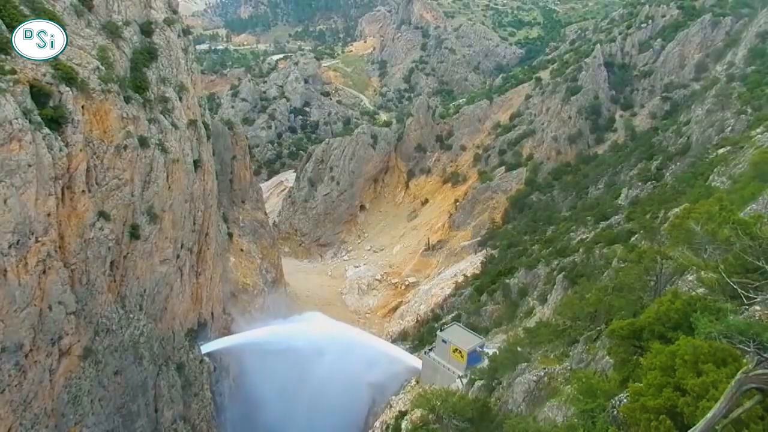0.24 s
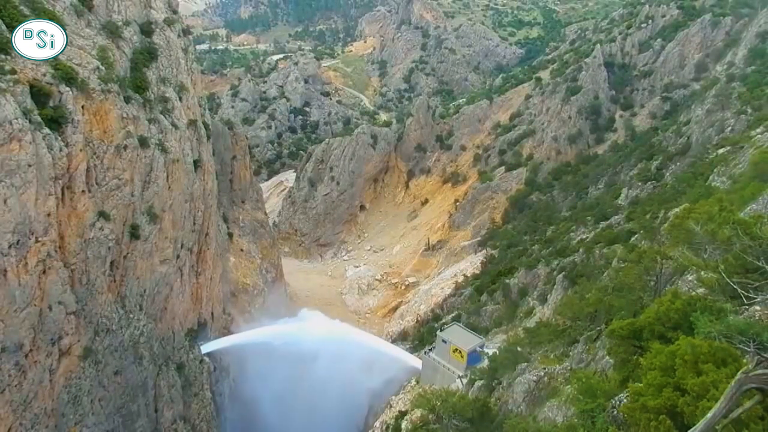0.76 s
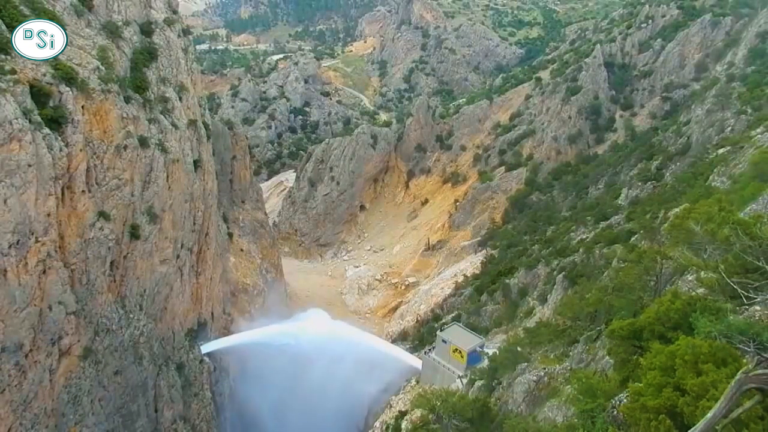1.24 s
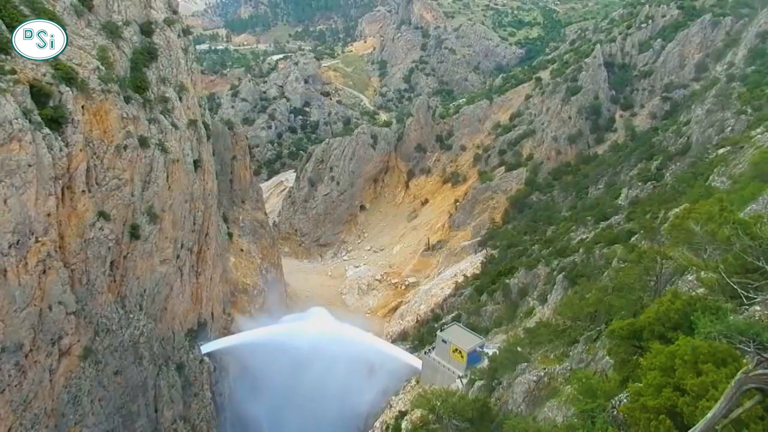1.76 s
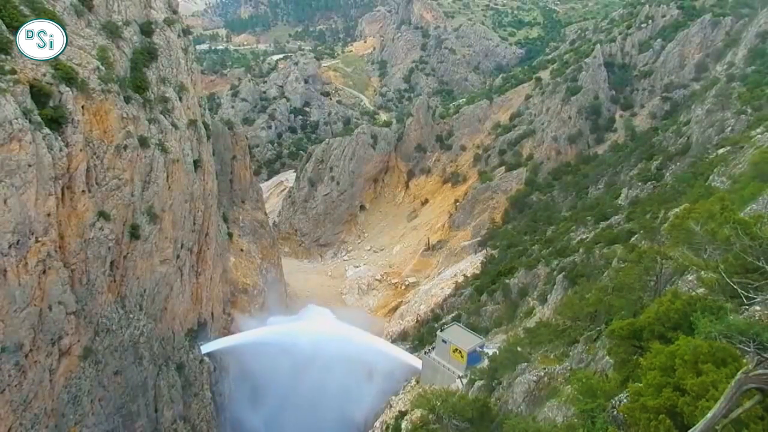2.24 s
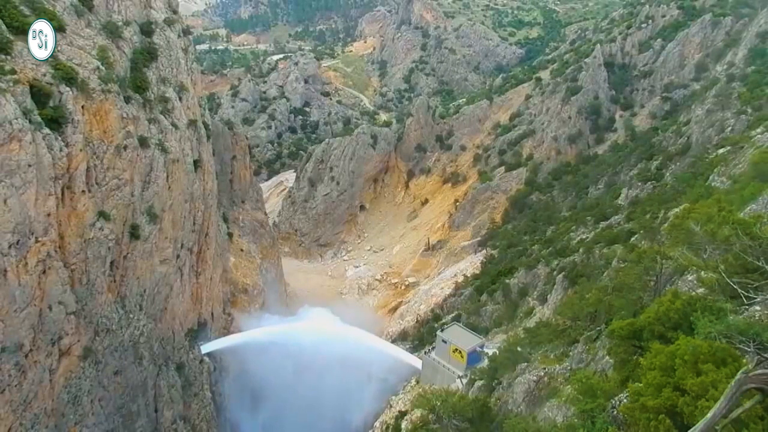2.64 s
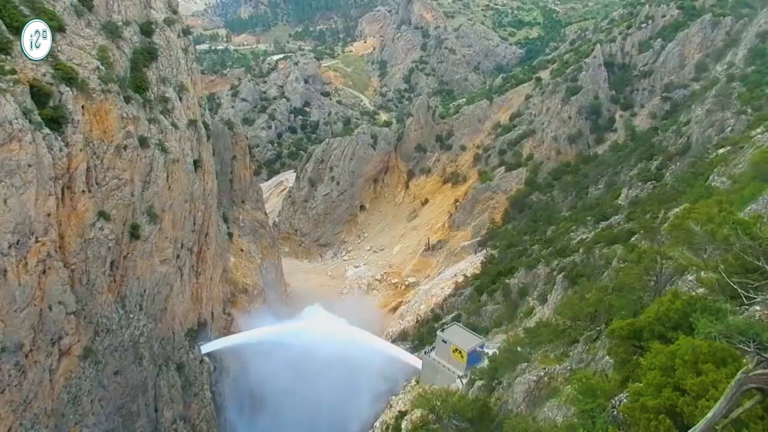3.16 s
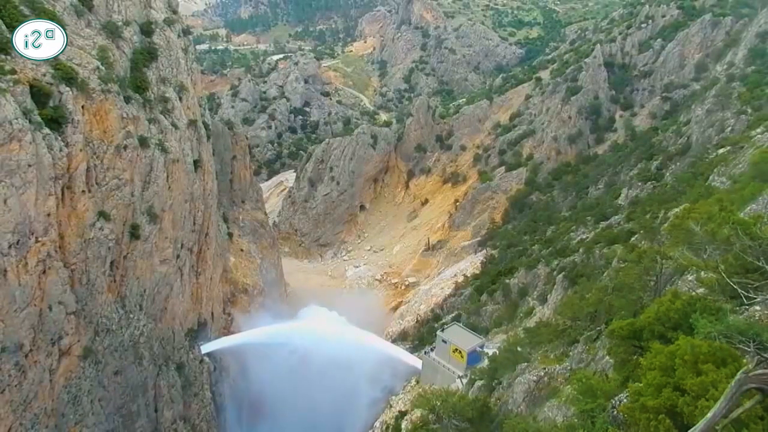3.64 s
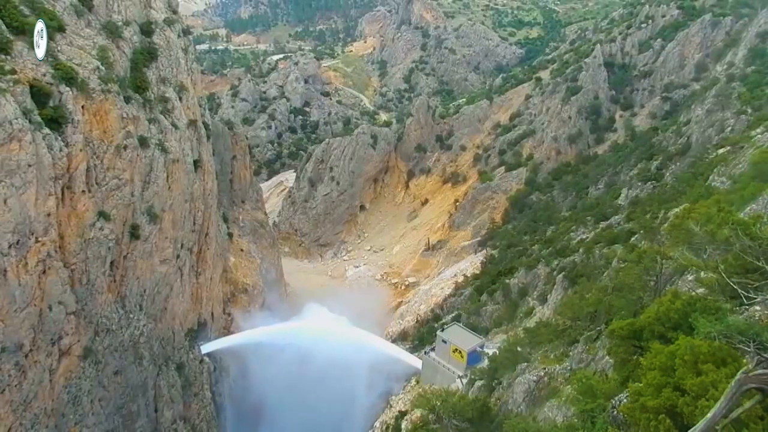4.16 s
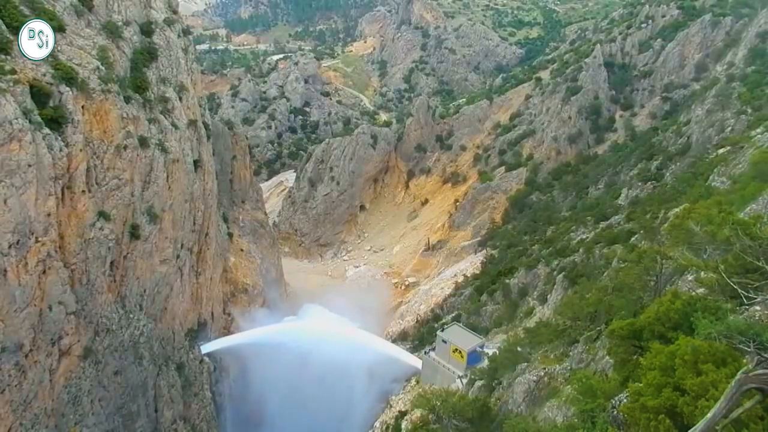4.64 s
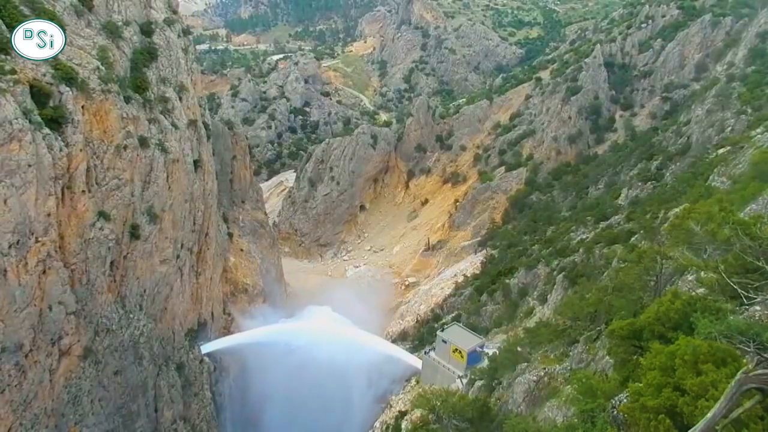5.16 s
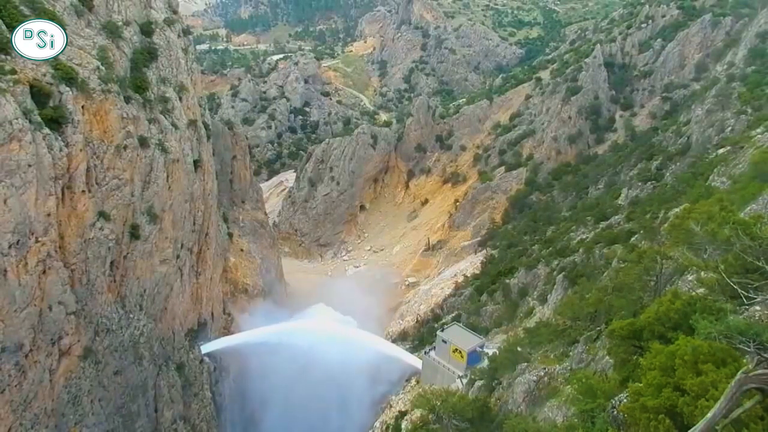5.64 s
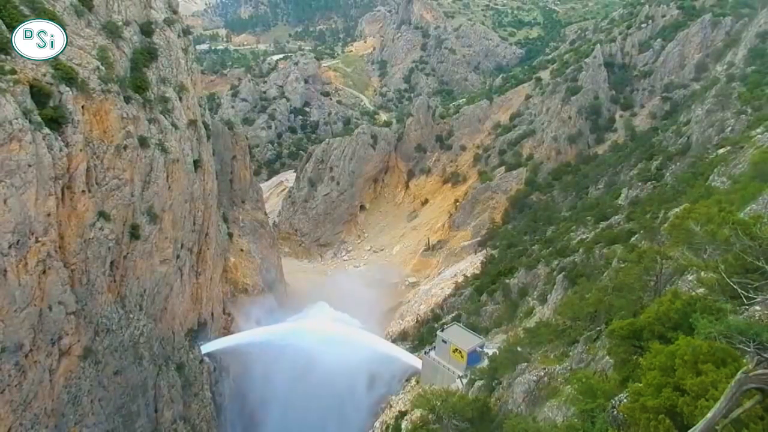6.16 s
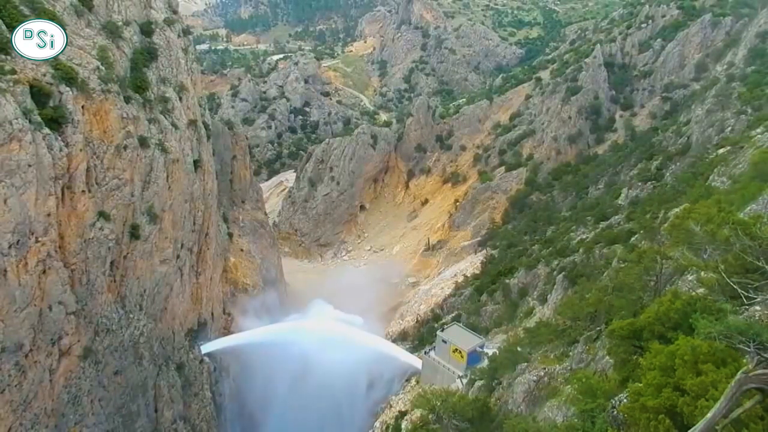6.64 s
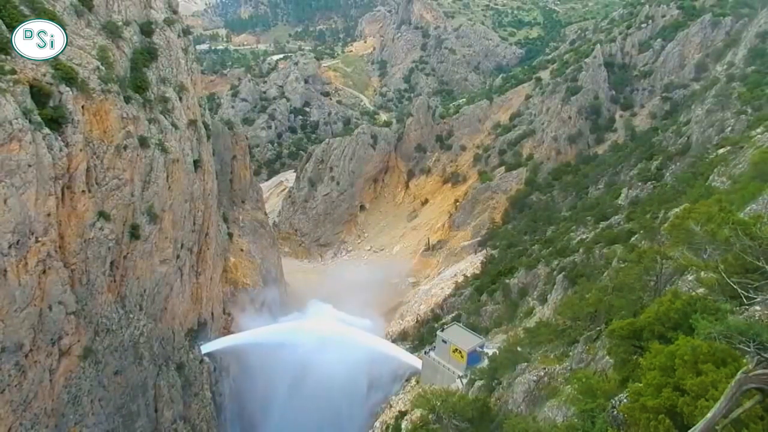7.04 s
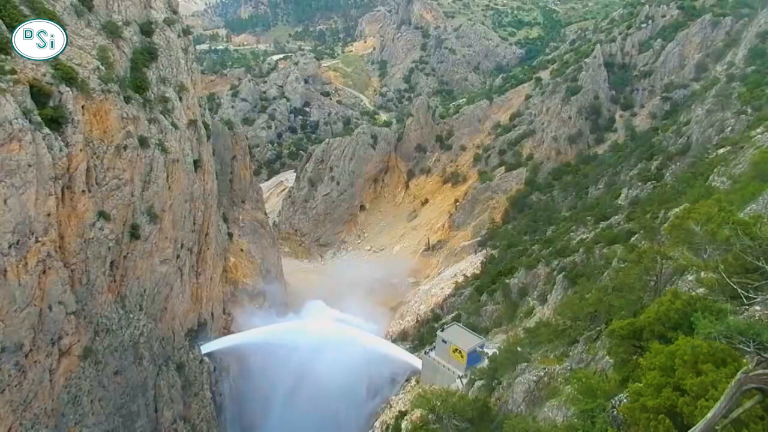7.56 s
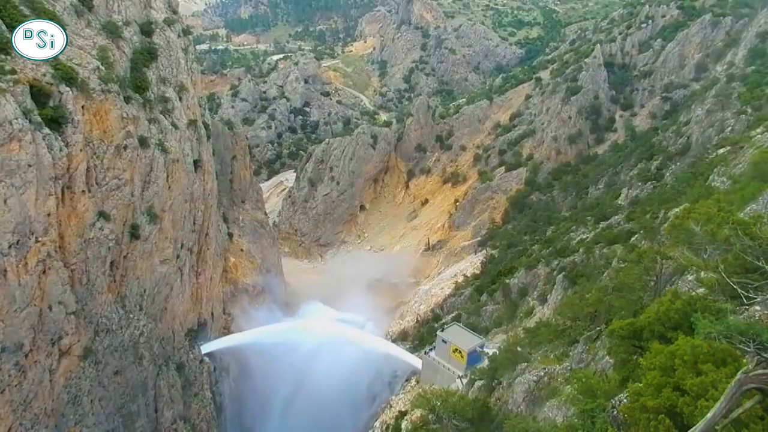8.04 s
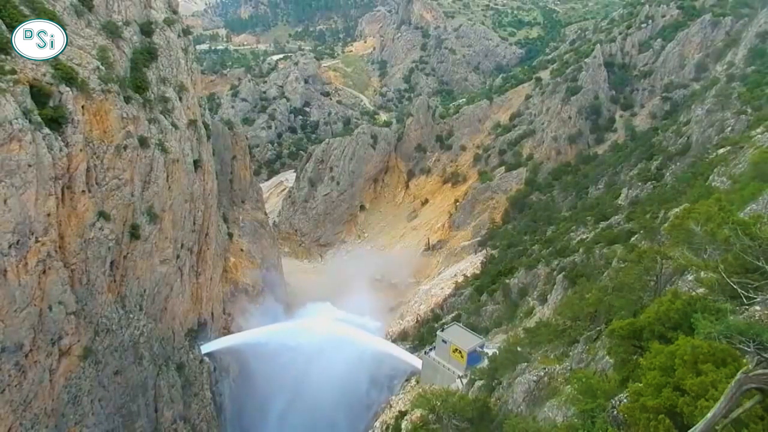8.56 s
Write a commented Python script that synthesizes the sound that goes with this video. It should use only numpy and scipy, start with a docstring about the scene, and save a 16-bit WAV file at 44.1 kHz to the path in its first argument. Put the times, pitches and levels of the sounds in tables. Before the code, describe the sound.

Two high-pressure jets from a dam pour into a deep rocky gorge, heard outdoors from far above on one microphone. A dense continuous roar, strong in the lows and softened on top by distance, carries a fine patchy spray hiss and grows very slightly throughout. Wind buffets the microphone with low lumpy rumble. The hardest gust hits at about 0.2-0.3 s with three quick heavy thumps; the roar ducks and swells back over the next few seconds. More gusts rumble at 0.7, 1.0 and 1.5 s, then it calms until a flurry around 3-3.2 s. Gusts with duller thumps come near 3.8, 4.8 and 5.5 s. From about 6 to 7.7 s mostly water remains. Buffeting returns at 7.8-8.1 s with several thumps, then lighter rumbles at 8.4 and 8.7 s. Barely audible ticks at 1.1 and 5.5 s, faint hiss and a very thin high whine lie underneath.

```python
"""Two high-pressure jets from a dam's outlets plunge into a deep rock gorge, heard from far above.
The falling water roars and its spray hisses: both are patchy noise, each with its own tone colour.
Gusts buffet the single microphone as low rumbling noise and short pressure slaps.
Faint ticks, amplifier hiss and a thin whine lie underneath.
The hardest wind pushes the recorder's gain down, so the roar drops and slowly swells back."""
import sys
import numpy as np
from scipy import signal
from scipy.fft import rfft, irfft, next_fast_len
from scipy.io import wavfile
from scipy.ndimage import uniform_filter1d, minimum_filter1d, map_coordinates

SR = 44100
rng = np.random.default_rng(int(sys.argv[2]) if len(sys.argv) > 2 else 0)


def dump_mix(stems):
    """Bounce the given channels to the path in sys.argv[1] as a 16-bit WAV at rate SR."""
    frames = np.atleast_2d(stems).T  # one column per channel
    limited = np.clip(frames, -1, 1)  # hard clip at full scale
    pcm = np.round(limited * 32767).astype(np.int16)
    wavfile.write(sys.argv[1], SR, pcm)


N = 388212  # length in samples


def amp(db):
    """Turn decibels into a gain factor."""
    return 10 ** (np.asarray(db) / 20)


def unit(x):
    """Scale x to an average strength (rms) of 1."""
    return x / np.sqrt(np.mean(x ** 2) + 1e-20)


def wobble(rate):
    """Draw a smooth random curve through `rate` random points a second."""
    points = rng.standard_normal(int(N * rate / SR) + 4)
    return map_coordinates(points, [np.arange(N) * rate / SR])


def filtered(x, response):
    """Multiply each frequency of x by the gain that response gives for it."""
    size = next_fast_len(N + SR // 2)  # spare room keeps the end from wrapping onto the start
    gain = response(np.fft.rfftfreq(size, 1 / SR))
    return irfft(rfft(x, size) * gain, size)[:N]


def coloured(x, spectrum):
    """Shape x by (f/Hz, level/dB) points joined on a log frequency axis, then scale it to rms 1."""
    hz, db = np.transpose(spectrum)

    def response(f):
        return amp(np.interp(np.log(f + 1), np.log(hz), db))

    return unit(filtered(x, response))


def churn(patchy_db):
    """Noise whose bands swell and fade in short patches, as clumps of water break up."""
    bands = signal.stft(rng.standard_normal(N), nperseg=512)[2]
    patches = rng.standard_normal(bands.shape)
    patches = uniform_filter1d(patches, size=7, axis=0)  # smooth across frequency
    patches = uniform_filter1d(patches, size=16, axis=1)  # smooth across time
    return signal.istft(bands * amp(patchy_db * unit(patches)), nperseg=512)[1][:N]


def water():
    """Countless impacts merge into a steady roar; the long air path takes the top off the spray."""
    # tone colour of the plunging water: (f/Hz, relative level per Hz/dB)
    roar_spectrum = [(15, -44), (30, -17), (54, -3), (75, 2), (115, -2), (175, -2.5), (270, -6.5),
                     (380, -7.5), (520, -10), (780, -11.5), (1300, -15.5), (2000, -20), (3400, -27.5),
                     (4800, -34.5), (7700, -59), (10000, -74), (16000, -120)]
    # tone colour of the spray: (f/Hz, relative level per Hz/dB)
    spray_spectrum = [(800, -30), (1800, -8), (2700, -1), (3600, -5.5), (4800, -12), (5800, -24.5),
                      (6700, -25), (8000, -46), (10000, -64.5)]
    start_db, growth_db_per_s = -17, 0.1822  # the water swells a little as the spray spreads

    plunge = amp(0.16 * wobble(2.8)) * coloured(churn(patchy_db=.5), roar_spectrum)
    spray_db = -17.5 + 0.44 * wobble(11.0)  # relative to the plunge
    spray = amp(spray_db) * coloured(churn(patchy_db=.5), spray_spectrum)
    flow_db = start_db + growth_db_per_s * np.arange(N) / SR + 0.17 * wobble(2.3)
    return amp(flow_db) * (plunge + spray)


def gustiness():
    """Each gust builds quickly and fades more slowly; their power adds to that of a restless breeze."""
    # gusts on the microphone: (t at the peak/s, rumble level before gain control/dB, fade time/s)
    gust_list = [(.04, -10, 0.07), (.28, 0, 0.16), (.68, -8.5, 0.24), (.97, -10.5, .05), (1.55, -9, .08),
                 (2.55, -21, 0.12), (3.02, -12, 0.077), (3.18, -14, .06), (3.59, -20, .05),
                 (3.8, -8.5, .11), (4.51, -13.5, .12), (4.78, -12, 0.18), (5.24, -16, .15),
                 (5.53, -12, 0.11), (5.69, -11.5, 0.09), (6.7, -25.5, 0.31), (7.85, -15.5, .12),
                 (8.09, -10.5, 0.086), (8.43, -16, 0.17), (8.731, -12, 0.062)]
    breeze_db = -28  # typical rumble between gusts
    rise_share = 0.61  # a gust builds in this share of its fade time

    power = amp(breeze_db + 4.1 * wobble(5)) ** 2
    for peak_s, db, fade_s in gust_list:
        age = (np.arange(N) / SR - peak_s) / fade_s  # negative before the peak
        distance = np.maximum(age, -age / rise_share)
        power = power + (amp(db) * np.exp(-distance)) ** 2
    return np.sqrt(power)


def wind():
    """Eddies on the microphone make a low, lumpy rumble whose strength follows the gusts."""
    # tone colour of wind on the microphone: (f/Hz, relative level per Hz/dB)
    buffet_spectrum = [(10, -34), (28, -12.5), (45, 2), (65, 0.5), (105, -5.5), (160, -14), (300, -22.5),
                       (700, -43.5), (2000, -93)]
    eddies = coloured(rng.standard_normal(N), buffet_spectrum)
    # dividing by the running strength evens out the noise, so the gusts set its level
    strength = np.sqrt(np.abs(uniform_filter1d(eddies ** 2, size=2000)) + 1e-6)
    return gustiness() * amp(0.51 * wobble(22)) * eddies / strength


def electronics():
    """The microphone's amplifier adds a faint hiss and a thin whine."""
    whine_hz = 13042
    hiss = amp(-69.0) * rng.standard_normal(N)
    whine = amp(-84.0) * np.sin(2 * np.pi * whine_hz * np.arange(N) / SR)
    return hiss + whine


def slaps():
    """A sharp eddy is one push of pressure between two weaker sucks."""
    # single slaps of wind on the microphone: (t/s, peak level before gain control/dB)
    slap_list = [(.201, 6.5), (.238, 6), (0.259, 10), (3.787, -1.5), (4.755, -6), (5.54, 0), (7.829, -4),
                 (8.029, 2), (8.138, 0.5)]
    half_width_s = 0.0027  # from the peak to where the push turns into a suck
    out = np.zeros(N)
    for slap_s, db in slap_list:
        u = (np.arange(N) / SR - slap_s) / half_width_s
        out += amp(db) * (1 - u ** 2) * np.exp(-u ** 2 / 2)
    return out


def ticks():
    """Tiny bright clicks, short bursts of treble noise, barely stand out above the spray."""
    # faint, sharp ticks in the top treble: (t/s, peak level before gain control/dB)
    tick_list = [(1.112, -48), (5.539, -50)]
    # tone colour of the ticks: (f/Hz, relative level per Hz/dB)
    tick_spectrum = [(3000, -20.5), (9000, -6), (11200, 0), (12500, -8), (16000, -12)]
    fade_s = .0012  # the rise takes as long
    envelope = np.zeros(N)
    for tick_s, db in tick_list:
        envelope += amp(db) * np.exp(-np.abs(np.arange(N) / SR - tick_s) / fade_s)
    return envelope * coloured(rng.standard_normal(N), tick_spectrum)


def scene():
    """Add the water far below, the wind close by, the ticks and the amplifier noise in one channel."""
    return (water() + wind() + slaps() + ticks() + electronics())[None]


def gain_control(x, threshold_db, recovery_db_per_s, start_db):
    """Whatever exceeds the threshold turns the gain down quickly; it creeps back at a steady rate."""
    level_db = 10 * np.log10(np.abs(uniform_filter1d(x[0] ** 2, size=120)) + 1e-9)
    excess_db = np.maximum(level_db - threshold_db, 0)
    excess_db[0] = start_db  # still held down by an earlier gust
    recovered_db = recovery_db_per_s * np.arange(N) / SR
    # the largest cut so far, less what has been recovered since
    cut_db = np.maximum.accumulate(excess_db + recovered_db) - recovered_db
    gain_db = minimum_filter1d(-cut_db, size=900)  # a short look-ahead lets the gain slide down before each peak
    return x * amp(uniform_filter1d(gain_db, size=900))


def record(dry):
    """The recorder rides its gain, rounds off the highest peaks and cuts what lies above its band limit."""
    top_hz = 15700
    held = gain_control(dry, threshold_db=-2, recovery_db_per_s=4.0, start_db=3.5)
    rounded = held / (1 + np.abs(held) ** 10) ** (1 / 10)
    low_pass = signal.ellip(12, .1, 90, top_hz, fs=SR, output="sos")  # .1 dB ripple, 90 dB cut
    return signal.sosfilt(low_pass, rounded)


dry = scene()
out = record(dry)
dump_mix(out)
```